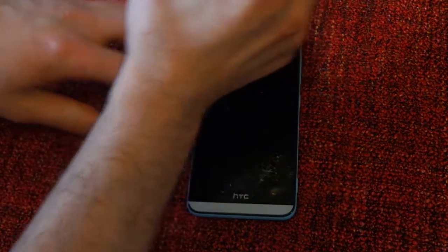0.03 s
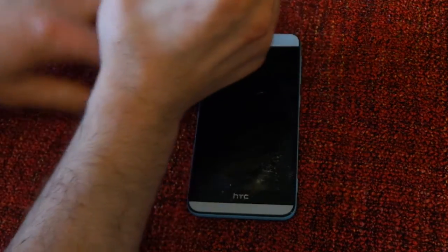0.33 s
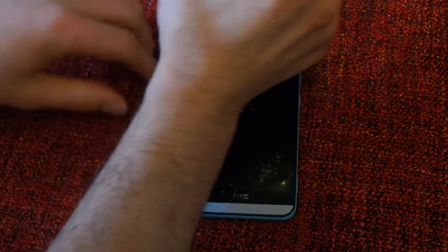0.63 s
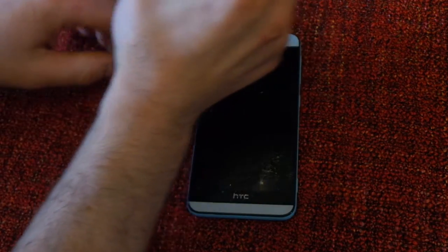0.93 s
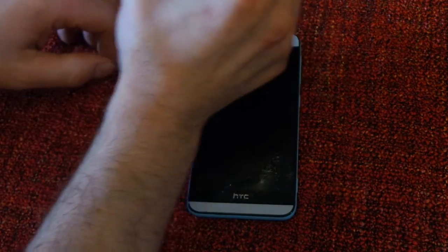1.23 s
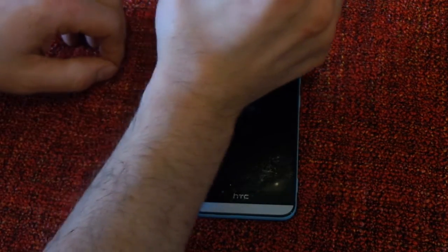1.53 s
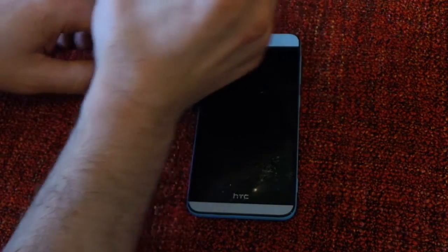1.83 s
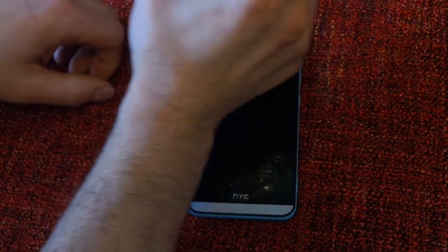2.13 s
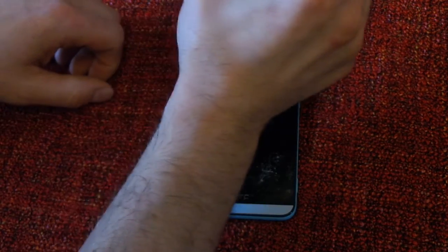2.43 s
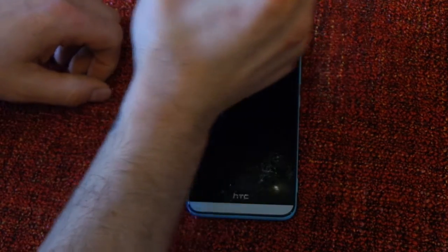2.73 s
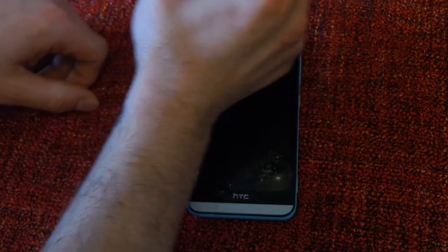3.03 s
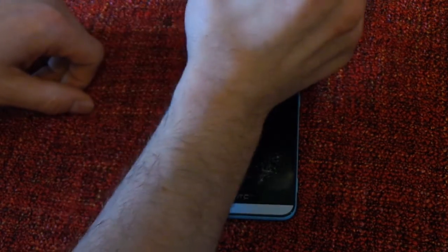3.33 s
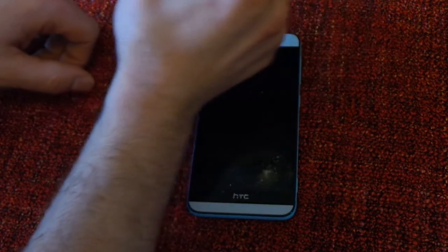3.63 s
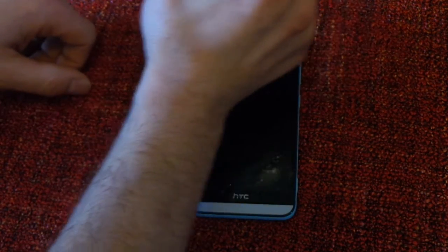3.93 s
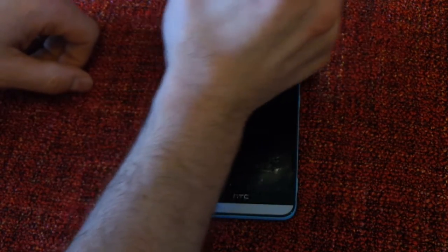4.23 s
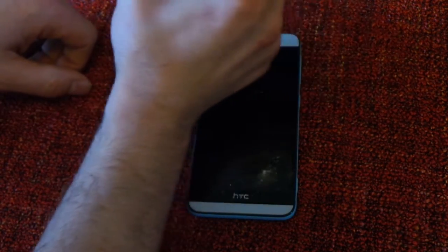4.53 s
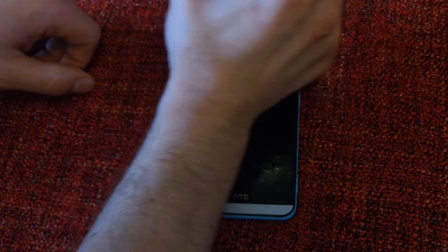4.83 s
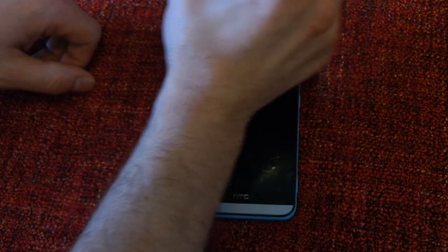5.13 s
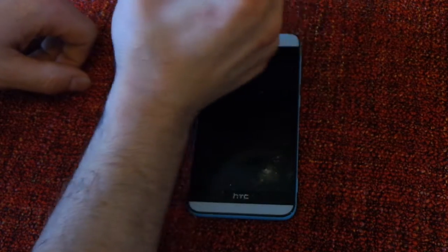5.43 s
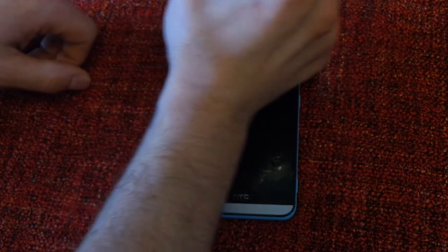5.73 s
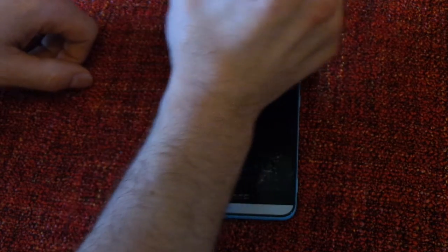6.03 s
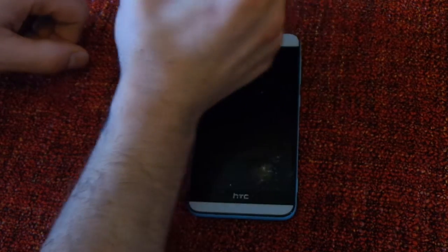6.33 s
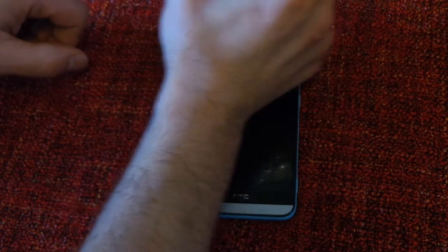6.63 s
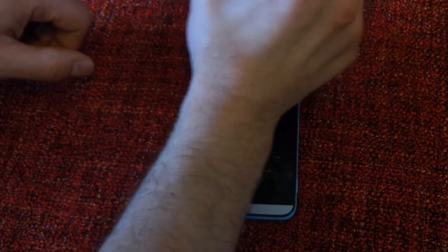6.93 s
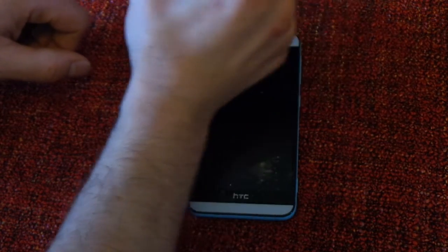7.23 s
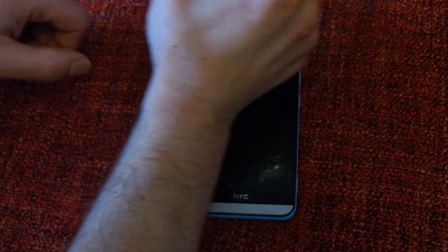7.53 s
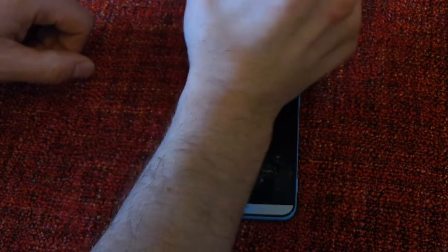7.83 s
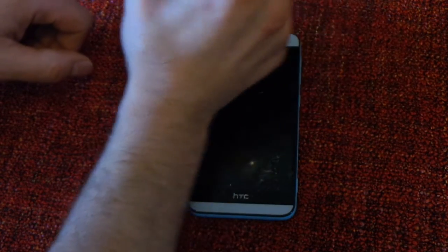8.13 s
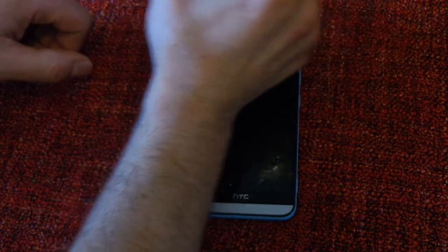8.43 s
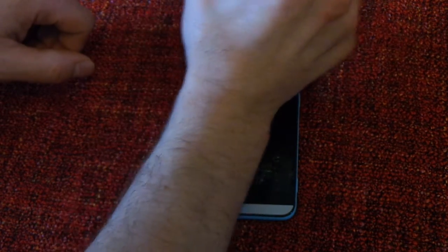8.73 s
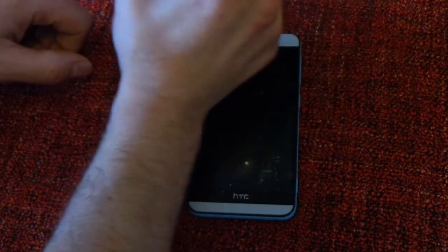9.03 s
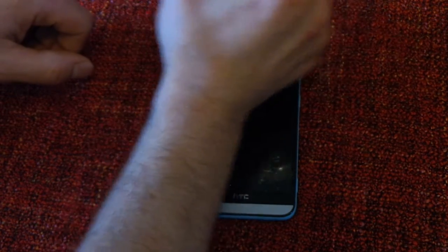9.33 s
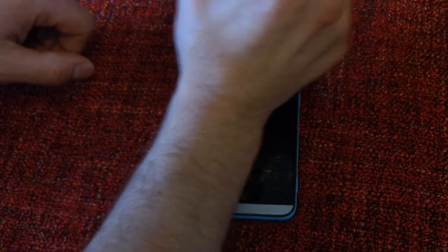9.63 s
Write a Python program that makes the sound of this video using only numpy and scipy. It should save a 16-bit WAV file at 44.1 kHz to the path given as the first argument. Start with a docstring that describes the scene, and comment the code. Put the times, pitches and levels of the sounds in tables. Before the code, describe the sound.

A handheld hair dryer blows steadily with a constant hum, its hiss swelling about once a second as it sweeps.

```python
"""A handheld hair dryer runs steadily, swept to and fro about once a second over a cloth-covered table.
Turbulent air roars through the resonant housing and hisses from the nozzle as a jet; the rotor hums and
its nine blades whine. Hiss and whine are directional: they swell, and the hum dips, as the dryer turns
toward the single microphone. Near surfaces add weak reflections, and stray air rumbles faintly."""
import sys
import numpy as np
from scipy import signal
from scipy.fft import rfft, irfft, next_fast_len
from scipy.io import wavfile
from scipy.ndimage import uniform_filter1d, map_coordinates

SR = 44100
rng = np.random.default_rng(int(sys.argv[2]) if len(sys.argv) > 2 else 0)


def wrap_up_sound(samples):
    """Save the sound to the file named by the first command line argument, as 16-bit audio."""
    columns = np.atleast_2d(samples).T
    # keep every value between -1 and 1, then stretch to whole-number steps
    tamed = np.clip(columns, -1, 1)
    steps = np.round(tamed * 32767).astype(np.int16)
    wavfile.write(sys.argv[1], SR, steps)


N = 431298


def airflow(near_db, aim_db, split_hz=984):
    """Turbulence excites the housing: a low roar spreads all round; the rasp depends more on nearness."""
    # air rushing through the housing: (frequency [Hz], relative level [dB])
    spectrum = [(25, -62), (50, -40), (100, -26.5), (175, -20), (215, -10.5), (340, -9), (520, -8),
                (720, -2.5), (860, -5.5), (1200, -10.5), (1700, -10.5), (2350, -12.5), (2800, -18.5),
                (8000, -55)]
    body = filtered(turbulence(spectrum, flicker_db=.46), housing)
    roar = filtered(body, lambda hz: 1 / (1 + (hz / split_hz) ** 10))
    rasp = body - roar
    roar_db = -19.5 + .11 * near_db - .2 * aim_db
    rasp_db = -23 + .34 * near_db
    return amp(roar_db) * steadied(roar) + amp(rasp_db) * unit(rasp)


def housing(hz):
    """Cavity resonance: a gain curve in which each mode lifts a bell-shaped band."""
    # modes of the housing and the space round it: (frequency [Hz], width [Hz], gain [dB])
    modes = [(151.5, 23, 9), (204, 11, 2), (266, 12, 4), (342, 14.4, 7), (387.4, 47, 8.5), (426, 15, 5),
             (473, 24, 3.5), (553, 33, 9), (600, 32, 4.5), (671, 26, 5), (722, 26, 6), (786, 30, 6.8),
             (925, 22, 2), (936, 38, 5.5), (1016, 36, 4.5), (1078, 20, 7), (1176, 25, 6), (1258, 25, 5),
             (1327, 36, 4), (1390, 42, 4), (1458, 28, 5), (1560, 36, 3), (1776, 36, 3), (1894, 29, 5.5),
             (2090, 290, 5), (2990, 50, 2), (3130, 60, 3), (3440, 40, 6), (3640, 36, 3)]
    return amp(sum(db * bell(hz, centre, width, power=2) for centre, width, db in modes))


def shifting_timbre(air):
    """Time-varying filtering: four bands of the rushing air rise and fall independently."""
    # brief surges of the hollow roar: (time [s], duration [s], gain [dB])
    surges = [(.58, 0.11, 3.5), (1.7, 0.17, 2.8), (2.38, .14, 2), (2.78, 0.27, 2), (3.63, .11, 2.5),
              (4.4, .16, 1.5), (5.3, .14, 1.5), (6.15, 0.15, 1), (8.17, 0.21, 1.8), (8.9, 0.19, 2.8)]
    # a nasal resonance that comes and goes as the hand moves: (time [s], gain [dB])
    nasal = [(0, 0.5), (2.8, 0), (5.85, 0), (6.2, 0), (6.65, -0.2), (7.15, 0.5), (7.47, -2), (7.88, 2),
             (8.17, -2), (8.32, 1), (8.75, 0), (9.12, -3.2), (9.42, 2), (9.78, 0)]
    # the low middle, thin in the first seconds: (time [s], gain [dB])
    low_mid = [(0, -2.2), (.45, -1.2), (.9, .8), (1.3, -1.8), (1.9, -1.8), (2.6, 0), (7, .3), (9.78, 0)]
    # the bass, lean at first, then fuller: (time [s], gain [dB])
    bass = [(0, -3), (1.6, -2), (2.6, 0.5), (4.2, -2), (4.9, 0.5), (9.78, 0)]
    air = lifted(air, humps(surges), centre_hz=650, width_hz=290)
    air = lifted(air, curve(nasal), centre_hz=2000, width_hz=440)
    air = lifted(air, curve(low_mid), centre_hz=420, width_hz=190)
    return lifted(air, curve(bass), centre_hz=90, width_hz=230)


def jet(near_db, aim_db):
    """Jet noise is directional: it swells with the aim, the whoosh more than the hiss."""
    # hiss of the jet: (frequency [Hz], relative level [dB])
    hiss_spectrum = [(200, -32), (1500, -3.5), (3200, -0.5), (4400, -2.5), (5000, -1.6), (5500, -2.5),
                     (6000, -2.5), (6600, -4.5), (8000, -3.5), (8900, -6.5), (9600, -6.5), (10600, -8.5),
                     (13200, -10.5), (14400, -21.5)]
    # its lower whoosh: (frequency [Hz], relative level [dB])
    whoosh_spectrum = [(1500, -30), (2350, -5.5), (2700, 1), (3000, 1), (3500, -3), (4200, -2.5),
                       (5200, -23), (8000, -38)]
    hiss = turbulence(hiss_spectrum, flicker_db=.55)
    whoosh = unit(filtered(turbulence(whoosh_spectrum, flicker_db=.55), housing))
    hiss_db = -27 + .83 * near_db + .99 * aim_db
    whoosh_db = -32 + .26 * near_db + 1.64 * aim_db
    return amp(hiss_db) * hiss + amp(whoosh_db) * whoosh


def nozzle_resonance(near_db, aim_db):
    """Air excites narrow resonances of the nozzle, strongest from close by and on axis."""
    # nozzle modes: (frequency [Hz], width [Hz], relative level [dB])
    modes = [(4300, 150, -4), (4940, 280, 0.5), (5980, 380, -0.5)]
    response = lambda hz: sum(amp(db) * bell(hz, centre, width) for centre, width, db in modes)
    ringing = unit(filtered(rng.standard_normal(N), response))
    return amp(-41.5 + 3.9 * near_db + 3.5 * aim_db) * ringing


def close_rush(near_db):
    """Attenuation with distance: a soft mid-range rush fades quickly as the dryer eases away."""
    # the rush: (frequency [Hz], relative level [dB])
    spectrum = [(700, -40), (950, -1), (1100, -0.5), (1300, -2.5), (1700, -13), (3000, -60)]
    return amp(-30.5 + 6.4 * near_db) * turbulence(spectrum, flicker_db=.5)


def dulled(air):
    """Band attenuation: the air's bright edge dips at the far end of the later sweeps."""
    # dips of the bright band: (time [s], duration [s], gain [dB])
    dips = [(6.17, .2, -.6), (7.22, .28, -2), (8.1, .3, -1.6), (8.92, .2, -1)]
    return lifted(air, humps(dips), centre_hz=2800, width_hz=460)


def fan(aim_db, shade_db):
    """Rotor harmonics: hum and blade-passing whine lock to one shaft, over a turbulent whirr."""
    # shaft speed, a little fast early on: (time [s], rotation rate [Hz])
    speed = [(0, 295.2), (.6, 295.8), (1.1, 295.3), (1.4, 296.4), (2.4, 296.3), (3.5, 295.1), (5, 294.7),
             (6.6, 295.5), (8, 295.1)]
    # the fan slowly turns away from the microphone, and back a little: (time [s], whirr level [dB])
    turning = [(0, -27.5), (.5, -30.5), (1.2, -31), (1.55, -32.5), (2.3, -34), (3.1, -32), (5, -39),
               (7.3, -41.5), (8.4, -42), (9, -36), (9.78, -46)]
    # turbulence round the blades: (frequency [Hz], relative level [dB])
    whirr_spectrum = [(1500, -50), (2380, -14), (2560, -0.5), (2710, 5), (2860, 1.5), (3100, -31),
                      (3420, -5), (3750, -21), (5000, -45)]
    # rotor tones: (harmonic number, level [dB], directivity [dB/dB], share of shading, flutter [dB])
    tones = [(1, -28.2, 0, 1, 0.35), (8, -43.3, -.25, .4, 1.8), (9, -42, 1.25, 0, .9), (16, -58, .3, 0, 2),
             (17, -58, .3, 0, 2), (40, -56, 0, 0, 2)]
    turn_db = curve(turning)
    beam_db = turn_db - turn_db.mean() + 4.2 * aim_db
    shaft_hz = curve(speed) + .073 * wobble(10)
    angle = 2 * np.pi * np.cumsum(shaft_hz) / SR
    sound = amp(turn_db + 2.4 * aim_db) * turbulence(whirr_spectrum, flicker_db=.3)
    for harmonic, db, beamed, shaded, flutter_db in tones:
        # moving through the room's standing waves makes each tone flutter on its own
        level = amp(db + beamed * beam_db - shaded * shade_db + flutter_db * wobble(11))
        sound += level * np.sqrt(2) * np.sin(harmonic * angle + rng.uniform(0, 2 * np.pi))
    return sound


def mains_hum(hz=100, level_db=-60):
    """Mains-driven vibration of the motor radiates a faint pure tone."""
    return amp(level_db) * np.sqrt(2) * np.sin(2 * np.pi * hz * np.arange(N) / SR)


def table_reflection(direct, near_db, delay_s=.00064):
    """Comb filtering: a faint echo off the table interferes with the direct sound, more from close by."""
    echo = map_coordinates(direct, [np.arange(N) - delay_s * SR])
    return direct + .06 * amp(4 * near_db) * echo


def room(x):
    """Early reflections from near surfaces ripple the spectrum by interference."""
    # reflections: (delay [s], gain [ratio])
    echoes = [(.00771, .09), (.01014, .07)]
    return filtered(x, lambda hz: 1 + sum(gain * np.exp(-2j * np.pi * hz * s) for s, gain in echoes))


def draught(puff_db=3, puff_hz=9):
    """Wind noise: uneven puffs of spilled air press on the microphone as a faint rumble."""
    # the stray air grows: (time [s], level [dB])
    strength = [(0, -59.5), (2.7, -59), (3.6, -57.5), (5.8, -57.5), (7, -54), (8.2, -57), (9.75, -56.5)]
    # brief lulls: (time [s], duration [s], gain [dB])
    lulls = [(.5, .25, -10), (3.3, .35, -9), (4.22, .22, -15), (5.12, .25, -12), (6.18, .22, -12),
             (7.92, .15, -7), (9.5, .15, -13)]
    # its thudding: (frequency [Hz], relative level [dB])
    spectrum = [(20, -13), (35, -5), (50, -3), (80, 14), (100, 1), (130, 3), (300, -35), (1000, -80)]
    level_db = curve(strength) + humps(lulls) + puff_db * wobble(puff_hz)
    return amp(level_db) * turbulence(spectrum, flicker_db=1)


def turbulence(spectrum, flicker_db):
    """Spectrally shaped noise of rms 1 whose bands flicker slightly and randomly in level."""
    bands = signal.stft(rng.standard_normal(N), nperseg=1024)[2]
    flicker = uniform_filter1d(rng.standard_normal(bands.shape), size=10, axis=0)  # across frequency
    flicker = uniform_filter1d(flicker, size=16, axis=1)  # across time
    air = signal.istft(bands * amp(flicker_db * unit(flicker)))[1][:N]
    knots_hz, db = np.transpose(spectrum)
    return unit(filtered(air, lambda hz: amp(np.interp(np.log(hz + 1), np.log(knots_hz + 1), db))))


def steadied(x, span_s=.16):
    """Normalisation evens out slow changes of loudness: x over its running rms, scaled to rms 1."""
    power = uniform_filter1d(unit(x) ** 2, round(span_s * SR))
    return unit(x / np.sqrt(np.abs(power)))


def lifted(x, gain_db, centre_hz, width_hz):
    """Amplitude modulation of one band of x by a gain curve."""
    band = filtered(x, lambda hz: bell(hz, centre_hz, width_hz))
    return x + (amp(gain_db) - 1) * band


def filtered(x, response):
    """Linear filtering: the spectrum of x times a frequency response."""
    size = next_fast_len(N + SR // 2)
    return irfft(rfft(x, size) * response(np.fft.rfftfreq(size, 1 / SR)), size)[..., :N]


def bell(hz, centre, width, power=4):
    """Band-pass curve of peak 1, its width taken at half height."""
    return 1 / (1 + ((hz - centre) / (width / 2)) ** power)


def humps(rows, steepness=2.5):
    """Superposition of rounded swells, one for each (time [s], duration [s], gain [dB]) row."""
    t = np.arange(N) / SR
    return sum(db * np.exp(-np.abs((t - s) / (length / 2)) ** steepness) for s, length, db in rows)


def curve(rows):
    """Linear interpolation of (time [s], value) rows at every sample."""
    return np.interp(np.arange(N) / SR, *np.transpose(rows))


def wobble(rate):
    """Smooth random modulation: a spline through rate knots a second."""
    return map_coordinates(rng.standard_normal(int(N * rate / SR) + 4), [np.arange(N) * rate / SR])


def amp(db):
    """Decibels to amplitude ratio."""
    return 10 ** (np.asarray(db) / 20)


def unit(x):
    """Normalisation to rms 1."""
    return x / np.sqrt(np.mean(x ** 2) + 1e-20)


def scene():
    """Superposition: distance and aim shape the dryer's layers; one microphone feeds both channels."""
    # the dryer is held close at first, then eases away: (time [s], nearness [dB])
    nearness = [(0, .2), (1.5, -.3), (2.6, .1), (3.5, -.5), (4.3, -1.2), (6.1, -2.4), (8, -2.3), (9, -2.9),
                (9.78, -2.7)]
    # turns toward the microphone (negative: away): (time [s], duration [s], aim [dB], hum shading [dB])
    passes = [(.05, .3, .3, 2), (.55, .25, .45, 0), (1.13, 0.38, .7, .5), (2.0, 0.45, .9, -.5),
              (3.08, 0.5, 0.7, 3), (3.85, 0.38, 1.05, 4), (4.66, 0.42, 1.4, 1.5), (5.61, 0.54, 2.0, 3.5),
              (6.62, 0.54, 1.8, 4.5), (7.59, .5, 1.6, 3.5), (8.5, 0.42, 1.8, 3.4), (8.95, .25, -.3, -1.4),
              (9.45, 0.45, 2.2, 2.2)]
    near_db = curve(nearness)
    aim_db = humps((s, length, aim) for s, length, aim, _ in passes)
    shade_db = humps((s, length, shade) for s, length, _, shade in passes)
    roar = shifting_timbre(airflow(near_db, aim_db))
    hiss = table_reflection(jet(near_db, aim_db), near_db) + nozzle_resonance(near_db, aim_db)
    air = dulled(roar + hiss + close_rush(near_db))
    sound = room(air + fan(aim_db, shade_db) + mains_hum()) + draught()
    return np.array([sound, sound])


def record(dry, cutoff_hz=14450):
    """Band limiting: an ideal low-pass filter removes the highest treble."""
    return filtered(dry, lambda hz: hz < cutoff_hz)


dry = scene()
out = record(dry)
wrap_up_sound(out)
```